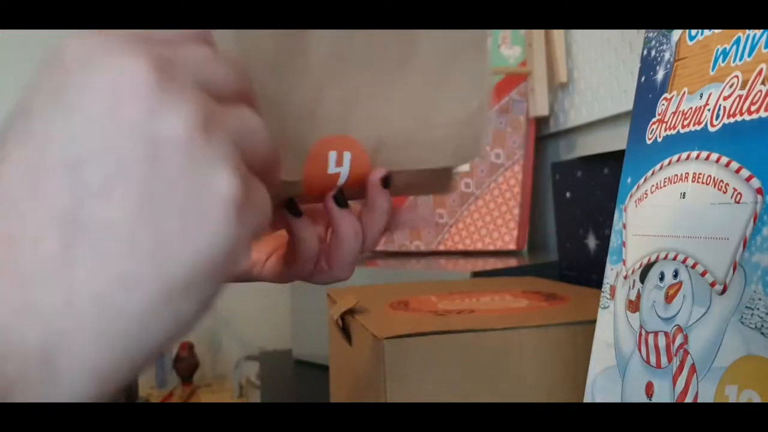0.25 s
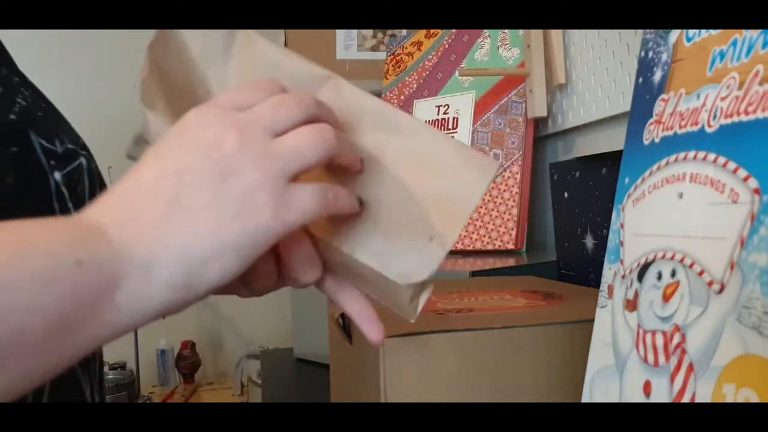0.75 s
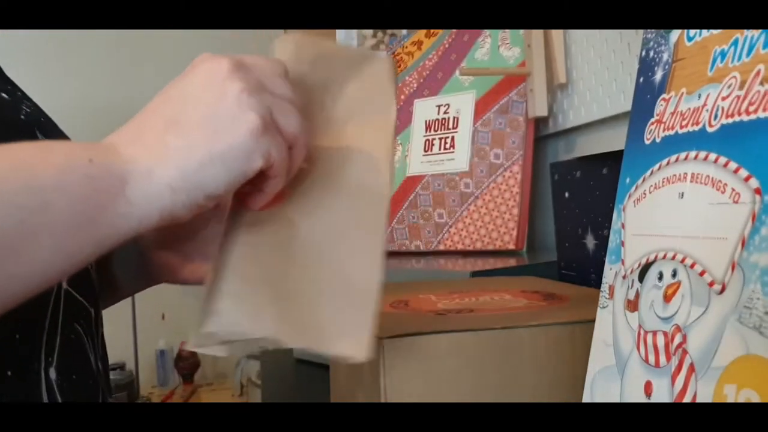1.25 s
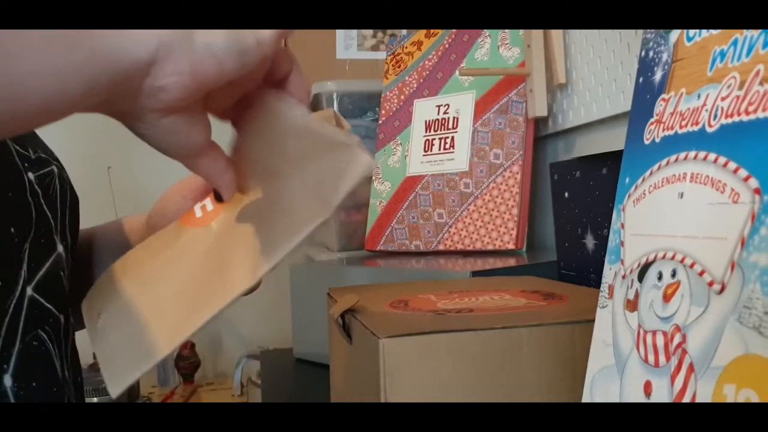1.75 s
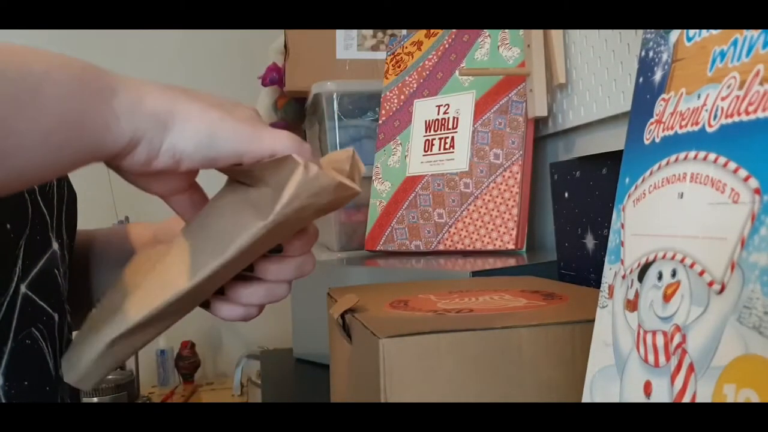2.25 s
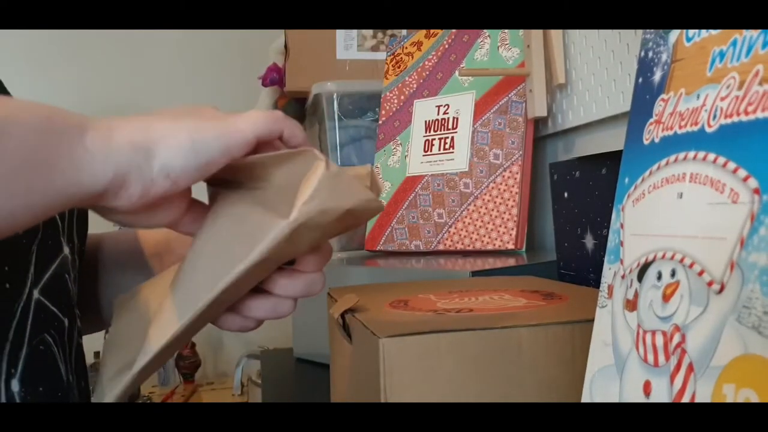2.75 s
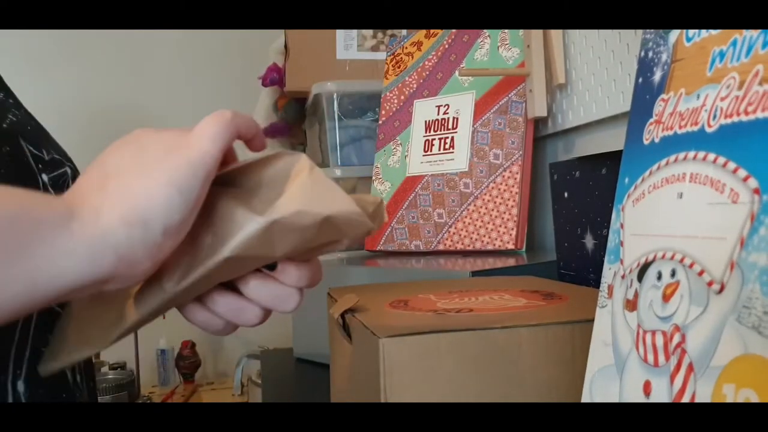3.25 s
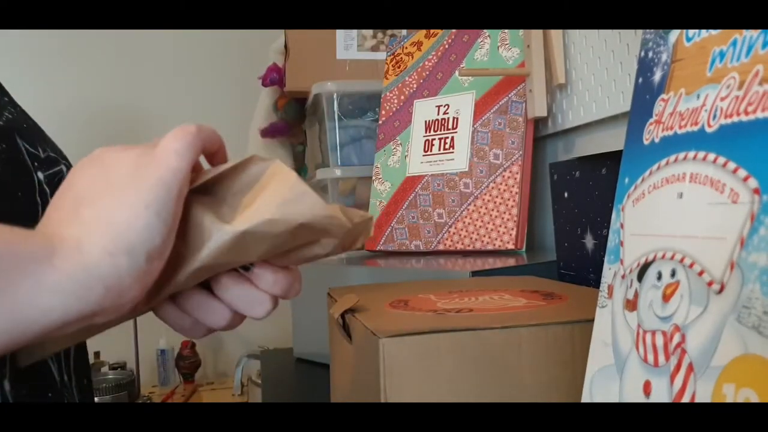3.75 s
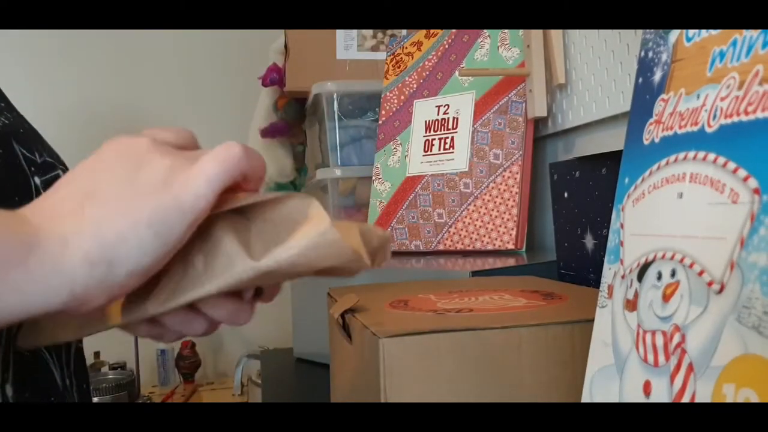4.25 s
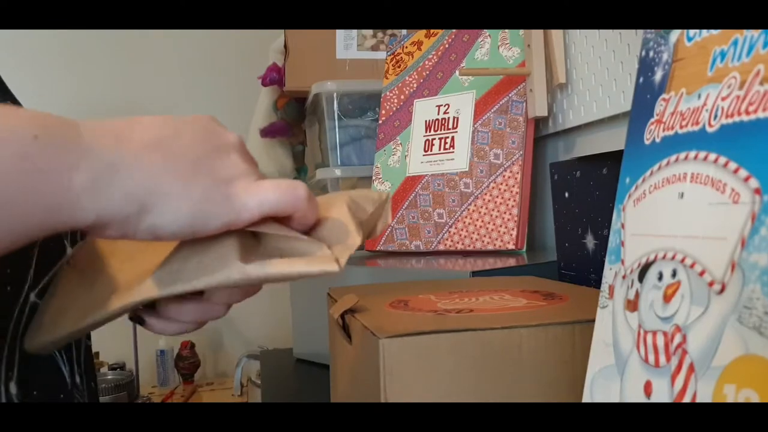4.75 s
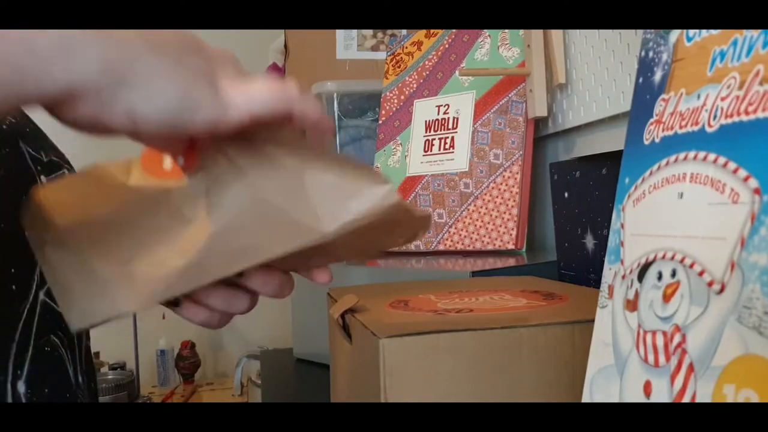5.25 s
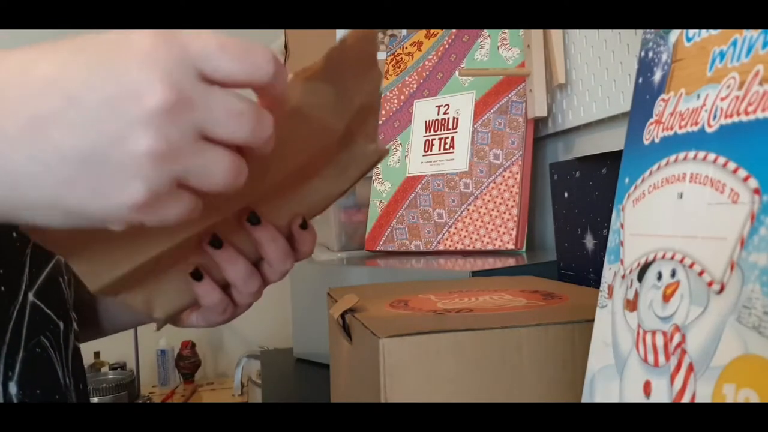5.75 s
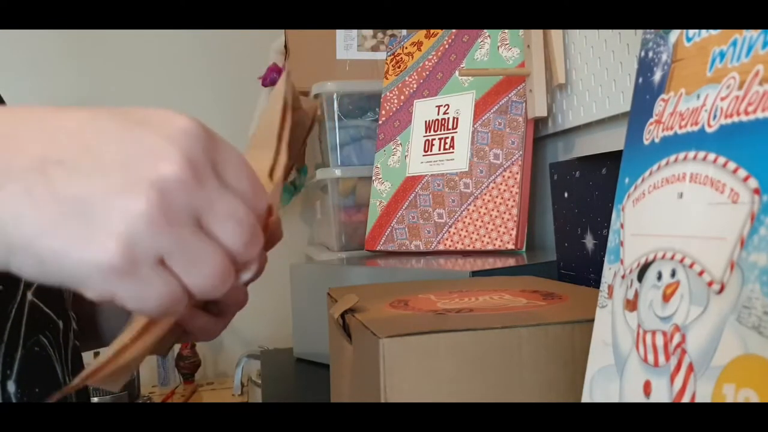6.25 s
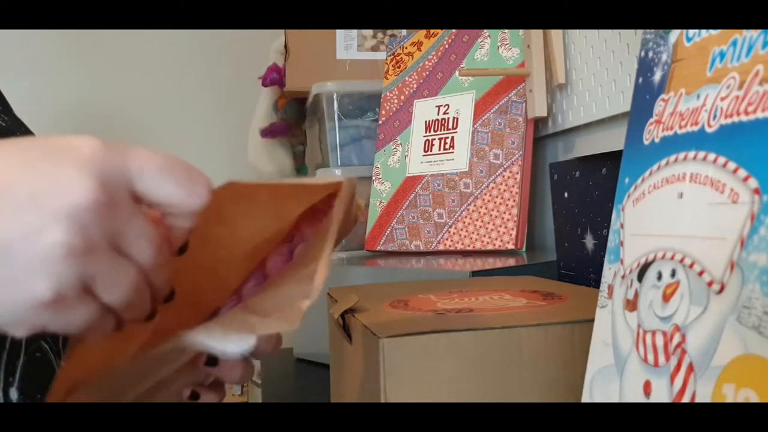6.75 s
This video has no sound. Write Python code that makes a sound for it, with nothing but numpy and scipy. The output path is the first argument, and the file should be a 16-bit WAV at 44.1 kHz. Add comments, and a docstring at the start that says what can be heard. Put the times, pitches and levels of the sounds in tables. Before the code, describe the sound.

Close stiff-paper crackling: bright creases pop over soft rubbing hiss, densest about two seconds in, then continuing in uneven bursts.

```python
"""A small paper bag is turned, squeezed and unfolded by two hands: creases buckle with sharp stereo snaps.
Each snap is a short noise crack plus a brief ring at its own pitch, split into bright crease and lower panel.
Between snaps skin and paper rustle: jittery friction hiss plus crowds of tiny buckles, levelled by hand strokes.
Whole sides pop with low damped sines; a short furnished-room tail and a faint steady noise lie behind."""
import sys
import numpy as np
from scipy import signal
from scipy.fft import rfft, irfft, next_fast_len
from scipy.io import wavfile
from scipy.ndimage import uniform_filter1d

SR = 44100
rng = np.random.default_rng(int(sys.argv[2]) if len(sys.argv) > 2 else 0)


def waveform_to_disk(signal):
    """Save audio, clipped to [-1, 1], as 16-bit WAV at the path in sys.argv[1]."""
    frames = np.transpose(np.atleast_2d(signal))
    scaled = np.clip(frames, -1, 1) * 32767
    samples = np.round(scaled).astype(np.int16)
    wavfile.write(sys.argv[1], SR, samples)


N = 308345
TAPS = 2048  # samples in a colour filter and in a buckle
HOLLOW_HZ, CREASE_HZ = 800, 3500  # voice crossovers: hollow | panel | crease


def amp(db):
    """Decibels to gain."""
    return 10 ** (np.asarray(db) / 20)


def rms(x):
    """Root mean square over all channels."""
    return np.sqrt(np.mean(x ** 2) + 1e-24)


def read(points, hz):
    """Interpolates a spectrum table on a log-frequency axis."""
    f, value = np.transpose(points)
    return np.interp(np.log(hz + 1), np.log(f), value)


def add(mix, start_s, sound):
    """Mixes sound into mix at start_s, in place."""
    part = mix[:, max(round(start_s * SR), 0):][:, :sound.shape[1]]
    part += sound[:, :part.shape[1]]


def colour(x, gain):
    """Minimum-phase filter of magnitude gain(hz): causal, so nothing sounds before a click."""
    hz = abs(np.fft.fftfreq(TAPS, 1 / SR))
    log_gain = np.log(gain(hz) + 1e-5)
    spectrum = np.exp(np.conj(signal.hilbert(log_gain)))
    response = np.fft.ifft(spectrum).real
    return signal.oaconvolve(x, response[None], axes=1)[:, :x.shape[1]]


def below(hz, edge_hz, order=6):
    """Low-pass magnitude."""
    return 1 / np.sqrt(1 + (hz / edge_hz) ** order)


def above(hz, edge_hz, order=6):
    """High-pass magnitude, power-complementary to below()."""
    return np.sqrt(1 - below(hz, edge_hz, order=order) ** 2)


def ports(left, other, lag_s, apart_hz=700):
    """Stereo pair: the right port hears the bag lag_s later, its treble partly independent."""
    likeness = 0.31  # left-right correlation well above apart_hz
    hz = np.fft.rfftfreq(len(left), 1 / SR)
    same = 1 - (1 - np.clip(likeness, 0, 1)) * above(hz, apart_hz, order=2)
    mixed = same * rfft(left) + np.sqrt(1 - same ** 2) * rfft(other)
    right = np.exp(-2j * np.pi * hz * lag_s) * mixed
    return np.array([left, irfft(right, len(left))])


# steady room noise spectrum, relative: freq_hz [Hz], density_db [dB per Hz]
FLOOR_SPECTRUM = [(30, -20), (120, 12), (400, -44)]
FLOOR_RMS_DB = -91


def floor():
    """Faint steady room noise: coloured Gaussian noise, independent left and right."""
    noise = colour(rng.standard_normal((2, N)), lambda hz: amp(read(FLOOR_SPECTRUM, hz)))
    return amp(FLOOR_RMS_DB) * noise / rms(noise)


# room decay: freq_hz [Hz], t60_s [s]
ROOM_DECAY = [(200, 0.19), (1500, 0.33), (6000, 0.16), (14000, 0.13)]


def room(x, first_s=0.0027, size=16384):
    """Reflections from desk, boxes and walls: sparse random taps, each band dying at its own speed."""
    taps_per_s = 3000
    t = np.arange(size) / SR
    struck = rng.random((2, size)) < taps_per_s / SR
    taps = rng.standard_normal((2, size)) * struck * (t > first_s)
    hz, age_s, z = signal.stft(taps, SR, nperseg=256)
    decay_db = -60 * age_s / read(ROOM_DECAY, hz)[:, None]
    tail = signal.istft(z * amp(decay_db), SR, nperseg=256)[1]
    tail = tail / np.linalg.norm(tail, axis=1, keepdims=True)
    return signal.fftconvolve(x, tail, axes=1)[:, :N]


# whole sides popping through: start_s [s], gain_db [dB, before the envelope], pitch_hz [Hz]
SIDE_POPS = [(2.122, -35.5, 245), (2.156, -41, 179), (2.199, -33, 154), (2.222, -33.5, 220),
             (2.294, -38, 370), (2.294, -47, 117), (3.941, -34, 372), (6.578, -30.5, 394),
             (6.697, -38, 392), (6.803, -35, 400)]


def pops():
    """A popping side pushes the air inside the bag: a damped sine of a few cycles."""
    rise_cycles, fade_cycles = .4, 1.3
    out, t = np.zeros((2, N)), np.arange(2 * TAPS) / SR
    for start_s, gain_db, pitch_hz in SIDE_POPS:
        turns = pitch_hz * t
        envelope = np.exp(-turns / fade_cycles) * (1 - np.exp(-turns / rise_cycles))
        ring = amp(gain_db) * envelope * np.sin(2 * np.pi * turns)
        add(out, start_s, np.array([ring, ring]))
    return out


# paper colour, relative: freq_hz [Hz], density_db [dB per Hz]
PAPER_COLOUR = [(30, -18), (70, -9.5), (130, -7), (230, -4), (380, 2), (560, 1), (950, 0), (1600, 4.5),
                (3600, 10), (5400, 5.5), (7300, 7), (8700, 2), (11800, 3), (14500, -1)]


def crease(hz):
    """Bright voice of stiff folds: paper colour above CREASE_HZ."""
    return amp(read(PAPER_COLOUR, hz)) * above(hz, HOLLOW_HZ, order=8) * above(hz, CREASE_HZ)


def panel(hz):
    """Middle voice of the flat sides: paper colour between HOLLOW_HZ and CREASE_HZ."""
    return amp(read(PAPER_COLOUR, hz)) * above(hz, HOLLOW_HZ, order=8) * below(hz, CREASE_HZ)


def hollow(hz):
    """Low voice of the bag and its air: paper colour below HOLLOW_HZ."""
    return amp(read(PAPER_COLOUR, hz)) * below(hz, HOLLOW_HZ)


# flip time scale of a facet at CREASE_HZ; lower facets take longer
FLIP_S, FLIP_DOUBLINGS_PER_OCTAVE = 0.00165, 0.1
RING_DB = -9.5  # ring rms against crack, same envelope
BOUNCE_DB, BOUNCE_S = -12, .006  # first reflection from the box under the hands
SCATTER_DB, SCATTER_S = -10, .0025  # waves scattering through the sheet


def buckle(pitch_hz, lag_s=0.00016, lag_spread=0.28):
    """One fold flips in about a millisecond: noise crack plus ring, with sheet scatter and a box bounce."""
    t = np.arange(TAPS) / SR
    flip_s = FLIP_S * (CREASE_HZ / pitch_hz) ** FLIP_DOUBLINGS_PER_OCTAVE
    onset_s = np.array([[0], [BOUNCE_S * rng.uniform(.85, 1.15)]])
    age = np.maximum(t - onset_s, 0) / flip_s
    flip, bounce = age ** 2 * np.exp(-2 * age ** 2) * np.e
    scatter = np.exp(-t / SCATTER_S) * (1 - np.exp(-t / flip_s))
    shape = flip + amp(BOUNCE_DB) * bounce + amp(SCATTER_DB) * scatter
    lag = lag_s * (1 + lag_spread * rng.standard_normal())
    crack = ports(*rng.standard_normal((2, TAPS)) * shape, lag)
    turns = pitch_hz * (t - np.array([[0], [lag]])) + rng.random()
    ring = np.sqrt(2) * shape * np.sin(2 * np.pi * turns)
    return crack + amp(RING_DB) * ring


def slide(lag_s=0.00016, soft_hz=13500, size=600):
    """Fibres catch and slip: soft hiss whose strength wavers over about a hundredth of a second."""
    catch_db = 2.2  # rms swing
    length = next_fast_len(N)
    catch = uniform_filter1d(rng.standard_normal(length), size)
    left, other = rng.standard_normal((2, length)) * amp(catch_db * catch / rms(catch))
    hiss = ports(left, other, lag_s)[:, :N]
    return colour(hiss / rms(hiss), lambda hz: below(hz, soft_hz, order=4))


def crackle(effort_db, count=96):
    """Small buckles of many sizes and pitches: a light touch sets off few, a squeeze a crowd."""
    per_s = 240  # rate at median effort
    spread_db, largest = 4.2, 2.3  # exponential size scale; cap in scales
    crowd = amp(effort_db - np.median(effort_db))
    folds = [buckle(pitch_hz) for pitch_hz in np.geomspace(1400, 13000, count)]
    size_db = spread_db * np.minimum(rng.exponential(1, N), largest)
    size = amp(size_db) * rng.choice([-1, 1], N) / np.sqrt(crowd)  # evens out crowd power
    fold = (count * np.sqrt(rng.random(N))).astype(int)  # high facets are commonest
    out = np.zeros((2, N))
    for at in np.flatnonzero(rng.random(N) < per_s * crowd / SR):
        add(out, at / SR, size[at] * folds[fold[at]])
    return out / rms(out)


# finger pushes and slides: start_s [s], length_s [s], level_db [dB, before voice trims],
# depth_db [dB: how far the whole bag gives, in full on the hollow, PANEL_DEPTH of it on the panels]
HAND_STROKES = [(0.0, 0.13, -47, -1.5), (0.114, 0.08, -54.5, 6), (0.208, 0.064, -45, 1.5),
                (0.371, 0.055, -50.5, -2.5), (0.452, 0.062, -46, -10.5), (0.655, 0.11, -45, -39),
                (0.728, 0.13, -42, 0.5), (0.857, 0.14, -45, -5), (1.015, 0.086, -38.5, -2),
                (1.147, 0.068, -39.5, -9), (1.318, 0.16, -43, -16.5), (1.422, 0.036, -37.5, -24),
                (1.463, 0.088, -40.5, -2), (1.553, 0.097, -41.5, -56), (1.65, 0.16, -46.5, -1.5),
                (1.888, 0.034, -46, 8), (1.985, 0.02, -37.5, 0.5), (2.017, 0.023, -36.5, 1),
                (2.084, 0.15, -38, 1.5), (2.285, 0.014, -35, 7), (2.324, 0.11, -43.5, -9),
                (2.464, 0.072, -44.5, -8.5), (2.585, 0.037, -50.5, 8), (2.685, 0.06, -40, -1),
                (2.846, 0.074, -50.5, 3), (3.004, 0.13, -47.5, 0), (3.284, 0.025, -53.5, 9),
                (3.35, 0.028, -42.5, 1), (3.406, 0.12, -45.5, -1.5), (3.584, 0.11, -46, 0.5),
                (3.778, 0.051, -42.5, 2), (3.863, 0.032, -28.5, -7.5), (3.893, 0.064, -39, -1.5),
                (4.04, 0.12, -43.5, 0), (4.178, 0.11, -43, 2), (4.318, 0.051, -39, 3),
                (4.452, 0.14, -38.5, -2.5), (4.591, 0.053, -33.5, 1.5), (4.652, 0.13, -39.5, -1),
                (4.818, 0.051, -41.5, -2), (4.908, 0.019, -38, -3.5), (4.975, 0.23, -40, 3.5),
                (5.229, 0.083, -39, 3.5), (5.386, 0.13, -41.5, 3), (5.572, 0.058, -54, 8),
                (5.713, 0.025, -45, -1), (5.753, 0.107, -52.5, 1.5), (5.934, 0.127, -46.5, -2),
                (6.061, 0.061, -47.5, 4), (6.245, 0.069, -44, -10), (6.306, 0.057, -54.5, 4),
                (6.401, 0.034, -41.5, -4.5), (6.497, 0.11, -50, 1.5), (6.562, 0.034, -36, -2),
                (6.614, 0.034, -45, 4.5), (6.677, 0.049, -41, 4), (6.777, 0.037, -34, -0.5),
                (6.928, 0.029, -42.5, -1.5)]
BUILD_SHARE, RELEASE_DB_PER_S = 0.39, 210  # share of stroke length spent building
PANEL_DEPTH = 0.075
HOLDING_DB, HOLDING_DEPTH_DB = -52.5, -17  # light rub of the held bag


def handling():
    """Crease, panel, hollow levels in dB: strokes build, hold and release over the light rub of holding."""
    age_s, follows = np.arange(SR // 2) / SR, np.array([[0], [PANEL_DEPTH], [1]])
    power = amp(HOLDING_DB + follows * HOLDING_DEPTH_DB) ** 2 * np.ones(N)
    for start_s, length_s, level_db, depth_db in HAND_STROKES:
        build = np.minimum(age_s / (BUILD_SHARE * length_s), 1)
        release_db = RELEASE_DB_PER_S * np.maximum(age_s - length_s, 0)
        add(power, start_s, build * amp(level_db + follows * depth_db - release_db) ** 2)
    return 10 * np.log10(power)


# resonance swing as the bag changes shape: freq_hz [Hz], swing_db [dB rms before capping, also largest boost]
SHAPE_SWING = [(150, 6), (1500, 2.5), (12000, 0.7)]


def reshape(x, size=5):
    """The bag changes shape: resonances, the lower ones most, come and go in a few hundredths of a second."""
    bands_per_octave = 10
    hz, _, z = signal.stft(x, SR, nperseg=512)
    field = rng.standard_normal((64, z.shape[2]))
    field = uniform_filter1d(uniform_filter1d(field, size, axis=0), size, axis=1)
    band = (bands_per_octave * np.log2(1 + hz / HOLLOW_HZ)).astype(int)
    swing = np.minimum(field[band] / rms(field), 1)  # deep dips, modest peaks
    gain = amp(read(SHAPE_SWING, hz)[:, None] * swing)
    return signal.istft(z * gain, SR, nperseg=512)[1][:, :N]


def rustle(crease_db=0.0, panel_db=-4, hollow_db=-15):
    """Sliding hiss and crackles through three voices, levelled as the hands press and let go."""
    crackle_share = 1.2
    levels_db = handling()
    friction = slide() + crackle_share * crackle(levels_db[0])
    out = np.zeros((2, N))
    trims_db = crease_db, panel_db, hollow_db
    for voice, trim_db, level_db in zip((crease, panel, hollow), trims_db, levels_db):
        part = colour(friction, voice)
        out += part / rms(part) * amp(trim_db + level_db)
    return reshape(out)


# buckling creases: start_s [s], crease_level_db [dB, before trim], panel_level_db [dB, before trim],
# pitch_hz [Hz, ringing facet]
CREASE_SNAPS = [(0.017, -33.5, -39, 5060), (0.1606, -55, -37, 1650), (0.22, -36.5, -39.5, 10200),
                (0.2554, -46, -38, 6300), (0.3044, -35, -34.5, 1440), (0.4943, -38.5, -31.5, 3000),
                (0.598, -34.5, -36.5, 1650), (0.6682, -50, -41, 2520), (0.7482, -39.5, -38, 6800),
                (0.8653, -33.0, -37.5, 5600), (0.9273, -33, -36, 7500), (0.9525, -38, -39, 5800),
                (1.031, -35, -49, 7650), (1.047, -27.5, -31, 6900), (1.0817, -29.5, -49, 7460),
                (1.1049, -25, -30, 7120), (1.1606, -33, -37.5, 7600), (1.4418, -33, -34.5, 7200),
                (1.6495, -29, -36.5, 10840), (1.6868, -39.5, -36.5, 1570), (1.743, -28, -29, 2320),
                (1.778, -30.5, -46, 7340), (1.9745, -28.5, -38, 6800), (1.993, -27.5, -37, 11300),
                (2.0055, -45, -42, 7400), (2.0304, -23.5, -27.5, 3000), (2.0542, -27, -28, 4120),
                (2.0961, -26.5, -43, 5200), (2.1261, -25.5, -30.5, 12100), (2.155, -19.5, -39, 6900),
                (2.1684, -29, -41, 11700), (2.1852, -24, -30, 7840), (2.1996, -21.5, -30, 6940),
                (2.22, -26.5, -32.5, 7650), (2.2604, -36, -51, 7770), (2.2895, -27, -30.5, 2360),
                (2.2933, -22, -29.5, 7050), (2.4113, -35, -32.5, 7360), (2.61, -28, -32, 2350),
                (2.6442, -35, -37, 2320), (2.773, -39, -50.5, 5030), (2.806, -35, -41, 7450),
                (3.0064, -29.5, -40.5, 5260), (3.0213, -29.5, -34.5, 2540), (3.1066, -23.5, -36.5, 7600),
                (3.1319, -33, -42, 10600), (3.2958, -30, -36, 10870), (3.3677, -36, -39.5, 7440),
                (3.3716, -27.5, -35, 6870), (3.388, -35, -44, 9100), (3.61, -34.5, -35, 2700),
                (3.8329, -34.0, -41, 6130), (3.881, -25, -34, 2440), (3.885, -25, -38, 7950),
                (3.9422, -27, -49, 8150), (4.1402, -33, -37, 7130), (4.2348, -51, -30.5, 2220),
                (4.242, -37, -42, 2350), (4.34, -26, -42, 6290), (4.358, -29, -35, 5500),
                (4.51, -28, -57, 7060), (4.5954, -26, -33, 7500), (4.611, -31.5, -44, 6500),
                (4.6622, -33, -41, 7000), (4.69, -28, -37, 11300), (4.7733, -28.5, -44, 12050),
                (4.8606, -31.5, -47, 6150), (4.9222, -34, -39.5, 7000), (5, -33, -46, 6960),
                (5.0353, -37, -51, 5500), (5.076, -27, -31, 5200), (5.1307, -28, -39, 8600),
                (5.145, -29, -30, 7500), (5.1766, -28.5, -39, 11500), (5.4787, -29, -38, 7250),
                (5.58, -33.5, -41.5, 6900), (5.6618, -27.5, -36.5, 10000), (5.8234, -41.5, -63, 11400),
                (6, -39.5, -56.5, 12860), (6.141, -34, -40, 11600), (6.3145, -37, -43.5, 6760),
                (6.5756, -27, -33, 6200), (6.6431, -29.5, -38, 7900), (6.6916, -26.5, -36, 5120),
                (6.7152, -38, -39, 7400), (6.755, -33, -41.5, 3750), (6.7856, -27, -36, 7260),
                (6.9452, -36.5, -39, 7200)]
SNAP_S = .004  # span over which a snap's energy gives its level


def snaps(crease_db=1, panel_db=1):
    """Large buckles: each cracks its crease, flicks the panel beside it and rings at its own pitch."""
    out = np.zeros((2, N))
    for start_s, crease_level_db, panel_level_db, pitch_hz in CREASE_SNAPS:
        fold = buckle(pitch_hz)
        for voice, db in (crease, crease_level_db + crease_db), (panel, panel_level_db + panel_db):
            part = colour(fold, voice)
            add(out, start_s, amp(db) * part / rms(part) * np.sqrt(SNAP_S * SR / TAPS))
    return out


def scene(snap_room_db=-6, rustle_room_db=-8):
    """The bag close by, a little to the right, with the room behind it."""
    left_db = -0.8
    loud, fine = snaps() + pops(), rustle()
    wet = room(amp(snap_room_db) * loud + amp(rustle_room_db) * fine)
    balance = np.array([[amp(left_db)], [1]])
    return (loud + fine + wet) * balance + floor()


EDGE_HZ = 14750


def record(dry):
    """Band limit: linear-phase low-pass at EDGE_HZ."""
    lowpass = signal.firwin(511, EDGE_HZ, window=("kaiser", 8), fs=SR)
    return signal.oaconvolve(dry, lowpass[None], "same", axes=1)


dry = scene()
out = record(dry)
waveform_to_disk(out)
```